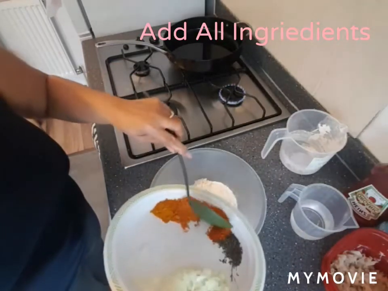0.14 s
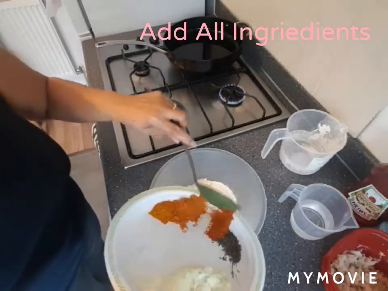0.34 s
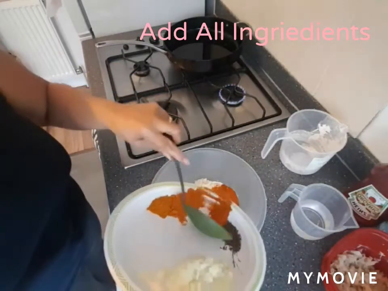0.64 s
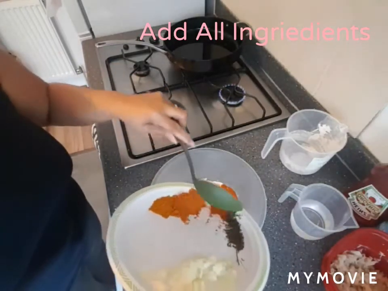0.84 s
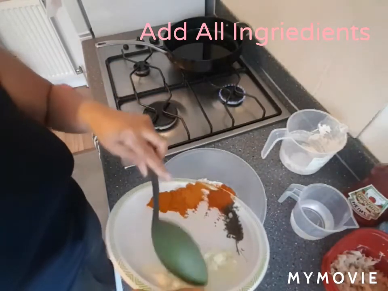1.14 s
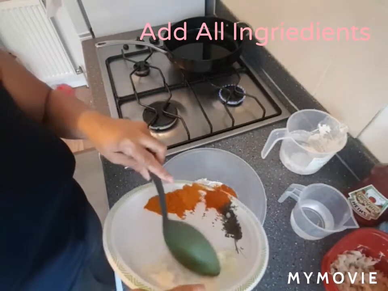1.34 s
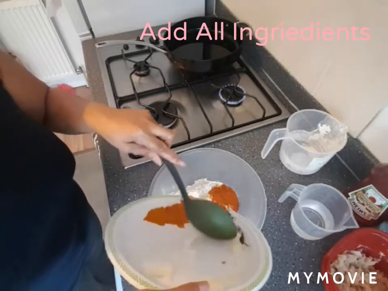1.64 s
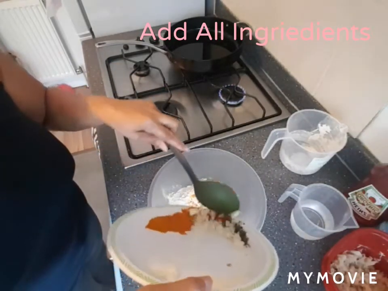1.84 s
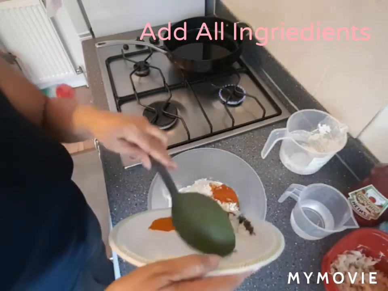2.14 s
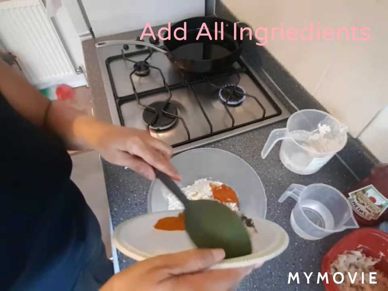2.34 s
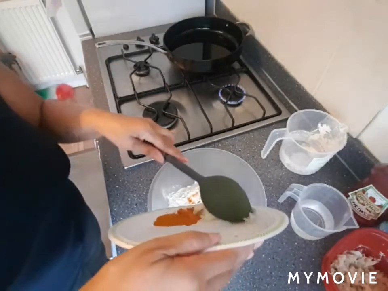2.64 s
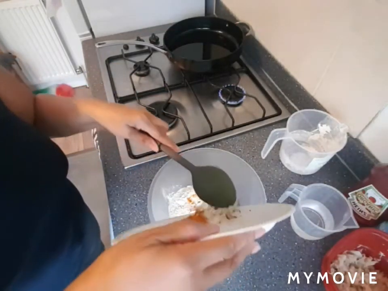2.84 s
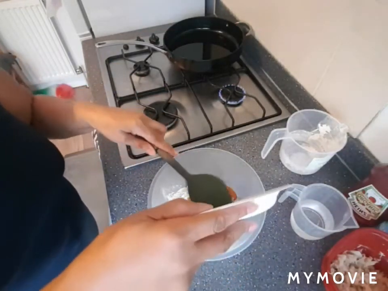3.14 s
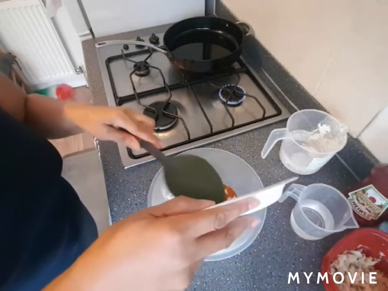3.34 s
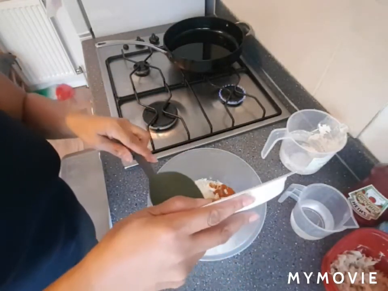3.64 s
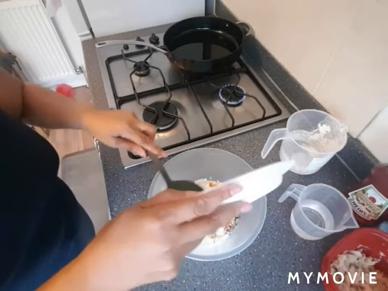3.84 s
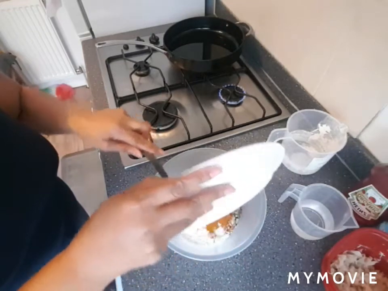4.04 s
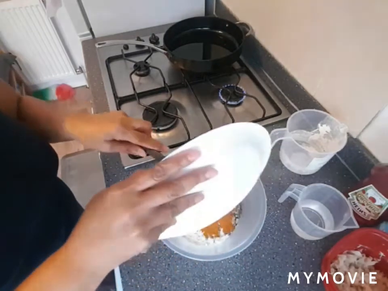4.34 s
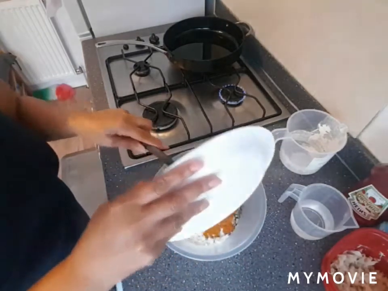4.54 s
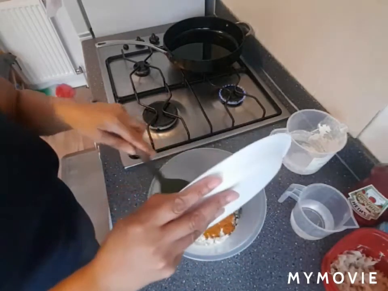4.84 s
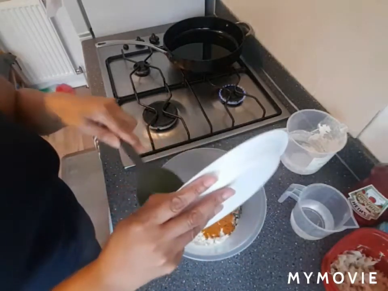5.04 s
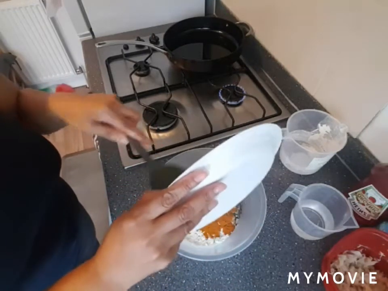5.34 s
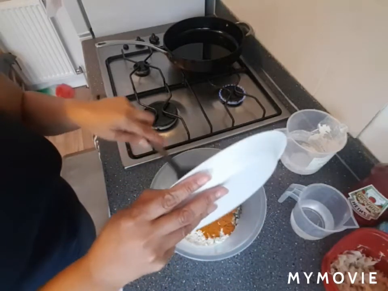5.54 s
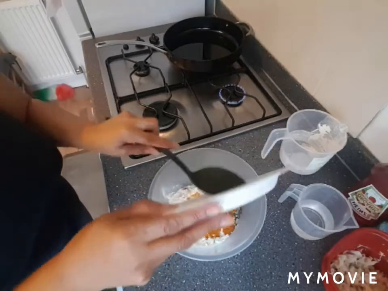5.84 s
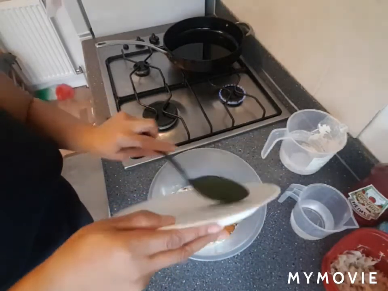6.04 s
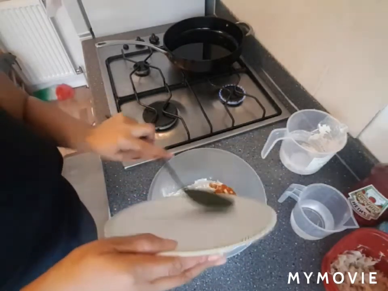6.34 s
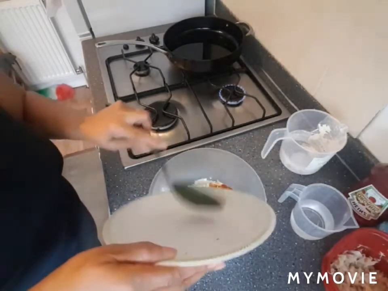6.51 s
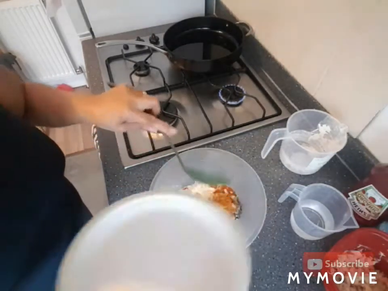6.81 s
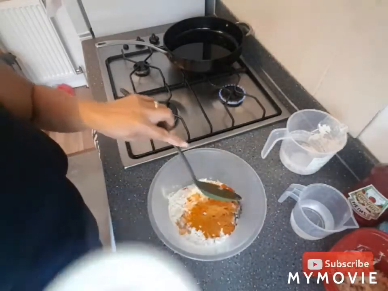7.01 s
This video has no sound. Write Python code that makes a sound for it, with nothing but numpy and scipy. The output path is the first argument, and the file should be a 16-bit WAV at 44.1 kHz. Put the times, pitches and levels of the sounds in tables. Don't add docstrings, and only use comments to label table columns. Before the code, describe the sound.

Quick gritty spoon swipes on a damped plate, then longer stuttering scrapes, light ticks and hard knocking taps, with faint steady hum beneath.

```python
import sys
import numpy as np
from scipy import signal
from scipy.fft import rfft, irfft
from scipy.io import wavfile
from scipy.ndimage import uniform_filter1d

SR = 44100
rng = np.random.default_rng(int(sys.argv[2]) if len(sys.argv) > 2 else 0)


def bounce(signal):
    frames = np.transpose(np.atleast_2d(signal))
    limited = np.clip(frames, -1, 1)
    pcm = np.round(limited * 32767).astype(np.int16)
    wavfile.write(sys.argv[1], SR, pcm)


def convert_level_to_amplitude(level_db):
    exponent = np.asarray(level_db, float) / 20
    return 10 ** exponent


N = 316225

# (start [s], length [s], plate ring [dB], spoon edge over ring [dB], powder hiss over ring [dB])
SWIPES = [(.105, 0.11, -36, -6.5, -0.5), (.19, 0.1, -33, -4.5, -7.5), (.29, 0.091, -50.5, -2, 4),
          (.355, 0.052, -45.5, 10, 8), (.4, 0.043, -37, -2.5, -14), (.738, 0.14, -33, -5.5, -6.5),
          (1.02, .09, -63.5, -2, -0.2), (1.29, 0.052, -57, 3.5, -6), (1.335, 0.11, -61.5, 5, -16),
          (1.38, 0.26, -47.5, -2.8, -12.5), (1.64, 0.38, -45.5, -9.5, -6.5), (1.72, .06, -41.5, -8, 0),
          (2.0, 0.11, -62.5, -3, -4), (2.52, 0.11, -54.5, 2, .1), (2.57, 0.2, -49.5, -13, -23),
          (3.143, 0.14, -39.5, -2.7, -4.5), (4.13, 0.082, -49.5, 7.5, 2), (4.45, 0.046, -46, 6.5, -4.5),
          (5.455, 0.1, -46, -2.5, -3.5), (5.81, 0.16, -46, 7, 9), (6.09, .12, -44, -1.5, 6),
          (6.2, 0.26, -55, -4, -2), (6.37, 0.16, -41, 4.3, 0), (6.65, 0.095, -33, -1.5, 1.1)]
# (start [s], length [s], plate ring [dB], spoon edge over ring [dB], powder hiss over ring [dB])
PUSHES = [
    (.03, 0.12, -42, 0.5, -3),
    (2.66, 0.18, -54.5, -6, 9.5),
    (3.66, 0.26, -44, 1, -15),
    (3.78, .13, -59.5, 19.5, 14),
    (6.38, 0.087, -40.5, 2.1, 9),
]
# (start [s], length [s], plate ring [dB], spoon edge over ring [dB], powder hiss over ring [dB])
SKIDS = [(0.0, 0.066, -38, -1.5, -12), (.72, 0.043, -42, -1, -8), (1.602, 0.44, -42, -18, -15.5),
         (2.305, 0.26, -60.5, 5, 10.5), (2.392, 0.35, -53, -1.5, 1.5), (2.812, 0.21, -54, 1, 15),
         (2.887, 0.16, -52.5, 8, 3), (3.535, 0.11, -60.5, .1, 1), (3.585, 0.9, -56, -7, -2),
         (3.625, 0.037, -44.5, -15, -26), (4.116, 0.038, -39, -38.5, -25), (4.22, 0.092, -42.5, -3, 1),
         (4.423, .04, -51, 2, -32), (4.518, 0.054, -41, -19, -0.5), (4.815, 0.14, -61, 4, -2),
         (4.94, 0.061, -56, -8, -25), (5.144, 0.2, -44.5, -4, -8.5), (5.363, 0.077, -61.5, -17, -25),
         (5.549, 0.079, -47.5, 6.5, 10), (5.792, 0.12, -46, -5.5, -31), (6.069, 0.1, -43, 4, -8),
         (6.351, 0.057, -35.5, .1, -31), (6.632, 0.039, -34.5, -4, 1.5)]
# (rise [power], fall [power], ring centre at rest [Hz], ring centre at full speed [Hz])
SWIPE_MOTION = (.8, 1.1, 600, 820)
PUSH_MOTION = (1.84, 0.82, 530, 1050)
SKID_MOTION = (0.033, 1.7, 440, 804)
EDGE_LAW, HISS_LAW = 1.85, 1.47

# (frequency [Hz], width [Hz], level [dB])
PLATE_MODES = [(310, 34, 16.5), (369, 18, -2), (410, 22, 10), (583, 6.7, 4.5), (699, 106, 13.5),
               (811.6, 9.2, -4), (870, 47, 6.5), (1037, 66, 2), (1094, 8.5, 4), (1275, 81, 1.5)]
# (frequency [Hz], width [Hz], level [dB])
EDGE_MODES = [(1566, 120, 11.5), (1725, 20, 9.5), (1897, 49, 2), (1958, 23, 3), (2236, 200, 14),
              (2487, 52, 6.5), (2716, 37, 8), (2878, 120, 10.5), (3240, 63, -1), (3850, 220, -45),
              (4074, 88, 5.5)]
# (frequency [Hz], level [dB per Hz])
POWDER = [(880, -22), (1500, -7), (1620, -53), (1840, -6), (2630, -11), (3070, 0), (3590, -7.5),
          (4120, -7.5), (5380, -9.5), (8040, -5.5), (9230, -16), (12600, -11.5), (15700, -18.5)]
HAND_HZ = 45
PATCHY_DB, PATCH_S = 5.5, .014
STICK_S, STICK_DB = .006, -7

# (time [s], peak [dB], ring [Hz], brightness above the ring [dB per octave], t60 [s])
LANDINGS = [(0.0, -23.5, 670, -24, 0.0093), (.116, -23.5, 1120, -13, 0.091), (.717, -22, 460, -1.3, 0.036),
            (.989, -37, 830, -6, 0.06), (1.278, -40.5, 545, -4.5, 0.16), (1.6, -22, 565, -4, 0.1),
            (2.314, -40.5, 338, -5, 0.14), (2.391, -38.5, 378, 3.5, 0.26), (3.116, -40.5, 357, -4.5, 0.089),
            (3.53, -45.5, 272, 2, 0.051), (4.114, -28.5, 842, -4, 0.23), (4.213, -24.5, 980, -5.5, 0.041),
            (4.421, -22, 997, -6, 0.061), (4.516, -22, 448, -1, 0.086), (4.936, -33.5, 796, -5.5, 0.033),
            (5.142, -22, 880, -0.5, .03), (5.229, -28.5, 864, -4, 0.035), (5.363, -43, 438, -13, 0.031),
            (5.549, -32.5, 235, -9, 0.019), (5.79, -30, 680, -6, 0.025), (6.067, -20, 357, 0.5, 0.08),
            (6.349, -16.5, 369, -2, 0.079), (6.63, -18.5, 466, -1.5, 0.21), (6.714, -18, 830, -0.2, 0.049)]
# (time [s], peak [dB], ring [Hz], brightness above the ring [dB per octave])
CATCHES = [(.152, -30, 720, 0), (.235, -19.5, 790, -2), (.265, -25.5, 826, 8), (.321, -37, 1020, .1),
           (.409, -34, 774, -5), (.76, -21.5, 736, 1), (1.368, -41.5, 1390, -14), (1.576, -35, 760, -12),
           (1.626, -21.5, 554, -7.5), (1.649, -24.5, 795, -10), (1.664, -26, 820, -8.5),
           (1.691, -25, 990, -8), (1.723, -31, 640, -4), (1.741, -32, 606, -4), (1.759, -31, 800, -11),
           (1.807, -30.5, 744, -4), (1.856, -39, 660, -18), (1.946, -41, 876, 3), (2.661, -42, 310, -13),
           (2.887, -27, 810, 3), (3.156, -37, 850, 8), (3.623, -37, 660, -23), (4.816, -54, 369, -9),
           (5.479, -36, 940, -20), (6.24, -38.5, 287, -15), (6.437, -17, 812, -5), (6.471, -29, 890, 2),
           (6.64, -34, 450, 1.5)]
# (time [s], peak [dB], ring [Hz], brightness above the ring [dB per octave])
TICKS = [(.362, -23, 3090, -4), (.378, -21.5, 2580, -2.5), (0.5717, -52, 1910, -24), (1.089, -54, 6030, -2),
         (1.341, -41.5, 1620, -2.5), (1.583, -41, 3800, -20), (2.033, -45, 2900, -10),
         (2.0874, -47.5, 2430, -2), (2.811, -35, 2960, 8), (2.921, -31.5, 2440, -9), (3.026, -43, 2080, -2),
         (3.074, -45.5, 2100, -3), (3.182, -25.5, 1880, -8), (3.367, -41.5, 2050, -1),
         (4.937, -32, 1550, -15), (4.94, -38.5, 2910, -35), (5.281, -37, 2900, -1),
         (5.888, -22.5, 3050, -6), (7.129, -59.5, 4000, -3)]
CATCH_T60_S, TICK_T60_S = .035, .07
BLOWS = LANDINGS + [(*row, CATCH_T60_S) for row in CATCHES] + [(*row, TICK_T60_S) for row in TICKS]
# (time [s], peak [dB], pitch [Hz])
THUDS = [(0.398, -37, 101), (0.717, -41, 127), (1.601, -52, 83.4), (4.118, -38, 104), (4.419, -36.5, 147),
         (4.513, -32, 70.6), (5.139, -39, 100), (5.227, -42, 95), (5.547, -41, 174), (6.16, -35.5, 121),
         (6.346, -45, 158), (6.435, -38, 96), (6.632, -30.5, 153), (6.715, -32.5, 82.4), (6.996, -52, 91)]

# (frequency [Hz], t60 [s])
KITCHEN = [(150, 0.54), (500, 0.26), (1500, .3), (5000, 0.34), (12000, 0.25)]
# (frequency [Hz], level [dB per Hz])
AIR = [(12, -62), (20, -16), (49, -9), (70, -15.5), (107, -18.5), (126, -14.5), (171, -21), (191, -23),
       (253, -21), (275, -27.5), (395, -21.5), (750, -32), (2290, -37.5), (9230, -54), (15700, -47)]
AIR_DB = -58
# (frequency [Hz], rms level [dB])
HUM = [
    (100.3, -52),
    (50.2, -72),
    (200.6, -79),
    (13824, -99),
]


def scraping():
    (ring_level, edge_level, hiss_level), centre_hz = strokes()
    grip = np.ones(N)
    for s, *_ in BLOWS:
        grip[max(round((s - STICK_S) * SR), 0):round(s * SR)] *= convert_level_to_amplitude(STICK_DB)
    judder = np.clip(wander(.006), -2, 2)
    plate_slips = slips(1500, 1.9, 0.7 * judder) * grip * ring_level
    plate = body(plate_slips, PLATE_MODES, centre_hz, 11.3)
    edge_slips = slips(3500, 2.0, 0.82 * judder) * grip * edge_level
    edge = body(edge_slips, EDGE_MODES, 3 * centre_hz, 3.3)
    grains = slips(12000, 0.33, 1.15 * judder)
    hiss = evened(coloured(grains, POWDER)) * grip * hiss_level
    return plate + edge + hiss


def strokes():
    t, power, centre = np.arange(N) / SR, np.full((3, N), 1e-14), np.zeros(N)
    kinds = [(SWIPES, SWIPE_MOTION), (PUSHES, PUSH_MOTION), (SKIDS, SKID_MOTION)]
    for table, (rise, fall, rest_hz, full_hz) in kinds:
        top = rise / (rise + fall)
        for s, length, db, edge_db, hiss_db in table:
            inside = slice(round(s * SR), round((s + length) * SR))
            share = np.clip((t[inside] - s) / length, 0, 1)
            speed = (share / top) ** rise * ((1 - share) / (1 - top)) ** fall
            ring_level = convert_level_to_amplitude(db) * speed
            edge_level = convert_level_to_amplitude(db + edge_db) * speed ** EDGE_LAW
            hiss_level = convert_level_to_amplitude(db + hiss_db) * speed ** HISS_LAW
            power[:, inside] += np.square([ring_level, edge_level, hiss_level])
            centre[inside] += ring_level ** 2 * (rest_hz + (full_hz - rest_hz) * speed)
    return np.sqrt(power), np.maximum(centre / power[0], 300)


def slips(per_s, spread_db, judder_db):
    size = convert_level_to_amplitude(spread_db * np.minimum(rng.exponential(1, N), 4)) * rng.standard_normal(N)
    happens = rng.random(N) < per_s / SR
    return evened(size * happens) * convert_level_to_amplitude(judder_db)


def body(drive, modes, centre_hz, focus_db):
    near = []
    for hz, _, db in modes:
        distance = np.log2(hz / centre_hz)
        near.append(convert_level_to_amplitude(db - focus_db * distance ** 2 + PATCHY_DB * wander(PATCH_S)))
    near = np.array(near)
    near /= np.sqrt((near ** 2).sum(0))
    return sum(ring(drive * share, hz, max(width, HAND_HZ)) for share, (hz, width, _) in zip(near, modes))


def ring(x, hz, width):
    r, w = np.exp(-np.pi * abs(width) / SR), 2 * np.pi * hz / SR
    return np.sqrt((1 - r ** 2) / 2) * signal.lfilter([1, 0, -1], [1, -2 * r * np.cos(w), r ** 2], x)


def tapping():
    out, t, count = np.zeros(N), np.arange(3000) / SR, 70
    chance = rng.random((len(BLOWS), 3, count))
    for (s, db, hz, bright_db, t60), (place, size, late) in zip(BLOWS, chance):
        crowd_hz = 180 * (15000 / 180) ** ((np.arange(count) + place) / count)
        octaves = np.log2(crowd_hz / hz)
        slope_db = np.where(octaves > 0, bright_db + 3.0 - 1.44 * octaves, -9)
        share = (2 * size - 1) * convert_level_to_amplitude(-4.0 + slope_db * abs(octaves))
        t60 = np.clip(t60, .008, .15)
        age = np.maximum(t - 0.0033 * late[:, None] ** 2, 0)
        crowd_t60 = 0.57 * t60 * (crowd_hz[:, None] / 700) ** -.45
        dying = convert_level_to_amplitude(-60 * age / crowd_t60) * (1 - np.exp(-age / .0003)) ** 2
        blow = share @ (np.sin(np.float32(2 * np.pi * crowd_hz[:, None] * age)) * dying)
        main_t60 = t60 * (hz / 500) ** -.6
        blow += 0.86 * np.sin(2 * np.pi * hz * t) * convert_level_to_amplitude(-60 * t / main_t60)
        blow *= 1 - np.exp(-t / .00025)
        add(out, s, convert_level_to_amplitude(db) * 1.15 * blow / abs(blow).max())
    return out


def thuds():
    out, t = np.zeros(N), np.arange(6000) / SR
    for s, db, hz in THUDS:
        turns = hz * t * (1 - 2.0 * t)
        onset = 1 - np.exp(-t / 0.00033)
        add(out, s, convert_level_to_amplitude(db - 60 * t / 0.081) * np.sin(2 * np.pi * turns) * onset)
    return out


def kitchen(x):
    taps = np.zeros(SR // 2)
    at = np.arange(200, len(taps) - 20, 20)
    taps[at + rng.integers(0, 20, len(at))] = rng.choice([-1., 1.], len(at))
    hz, t, z = signal.stft(taps, SR, nperseg=256)
    decay = convert_level_to_amplitude(-60 * t / read(KITCHEN, hz)[:, None])
    tail = signal.istft(z * decay, SR, nperseg=256)[1]
    return signal.fftconvolve(x, tail / np.linalg.norm(tail))[:N]


def background():
    t = np.arange(N) / SR
    air = convert_level_to_amplitude(AIR_DB) * evened(coloured(rng.standard_normal(N), AIR))
    bass = signal.sosfiltfilt(signal.butter(2, 160, fs=SR, output="sos"), air)
    air += bass * (convert_level_to_amplitude(0.75 * wander(0.019)) - 1)
    hum = sum(convert_level_to_amplitude(db) * np.sqrt(2) * np.sin(2 * np.pi * (hz * t + rng.random())) for hz, db in HUM)
    return air + hum * convert_level_to_amplitude(.9 * wander(.12))


def evened(x):
    return x / np.sqrt(np.mean(x ** 2) + 1e-20)


def read(points, hz):
    f, value = np.transpose(points)
    return np.interp(np.log(hz + 1), np.log(f + 1), value)


def add(mix, s, sound):
    part = mix[max(round(s * SR), 0):][:len(sound)]
    part += sound[:len(part)]


def coloured(x, points):
    return irfft(rfft(x) * convert_level_to_amplitude(read(points, np.fft.rfftfreq(len(x), 1 / SR))), len(x))


def wander(smooth):
    step = 32
    width = max(int(smooth * SR / step), 1)
    coarse = rng.standard_normal(N // step + 2)
    coarse = uniform_filter1d(uniform_filter1d(coarse, width), width)
    return np.interp(np.arange(N) / step, np.arange(len(coarse)), evened(coarse))


def scene():
    spoon = scraping() + tapping() + thuds()
    echoes = convert_level_to_amplitude(-9.5) * kitchen(spoon)
    return (spoon + echoes + background())[None]


def roll_off(x):
    return signal.sosfilt(signal.butter(12, 15830, fs=SR, output="sos"), x)


def record(dry):
    bass_cut = signal.butter(2, 45, "high", fs=SR, output="sos")
    top_cut = signal.firwin(511, 15800, window=("kaiser", 9), fs=SR)[None]
    mix = signal.oaconvolve(signal.sosfilt(bass_cut, dry), top_cut, "same")
    return roll_off(mix)


dry = scene()
out = record(dry)
bounce(out)
```